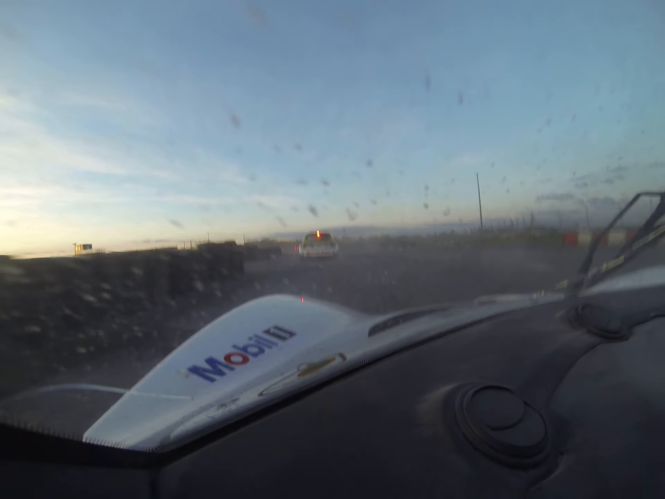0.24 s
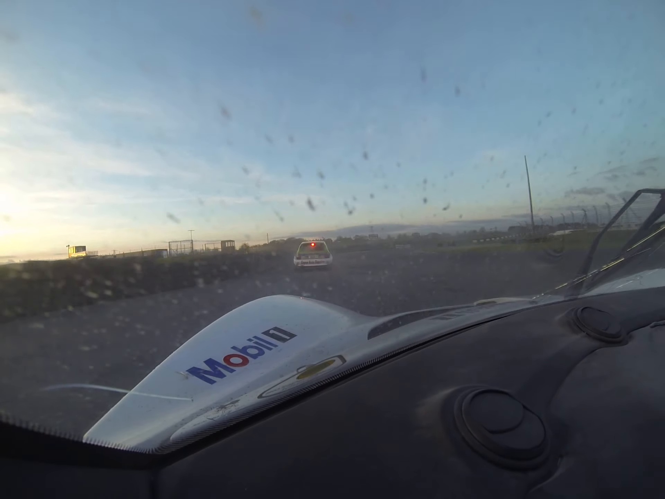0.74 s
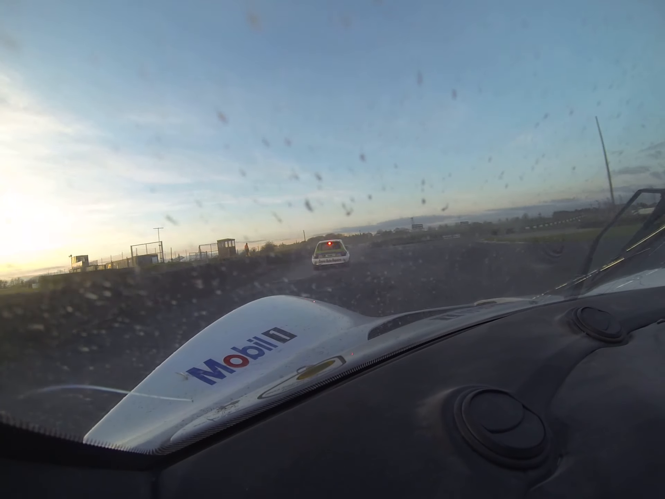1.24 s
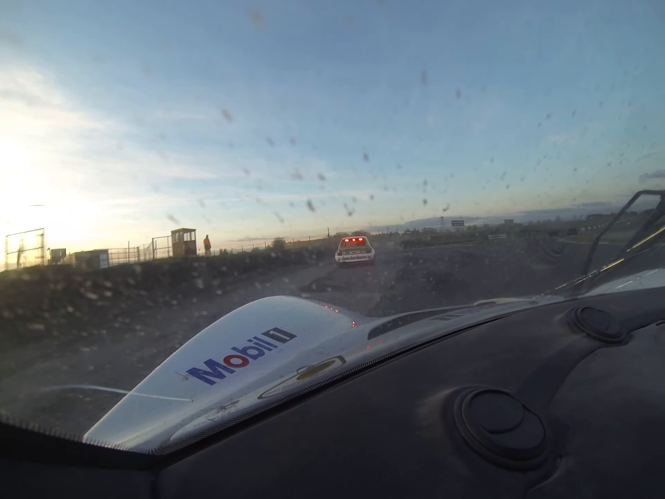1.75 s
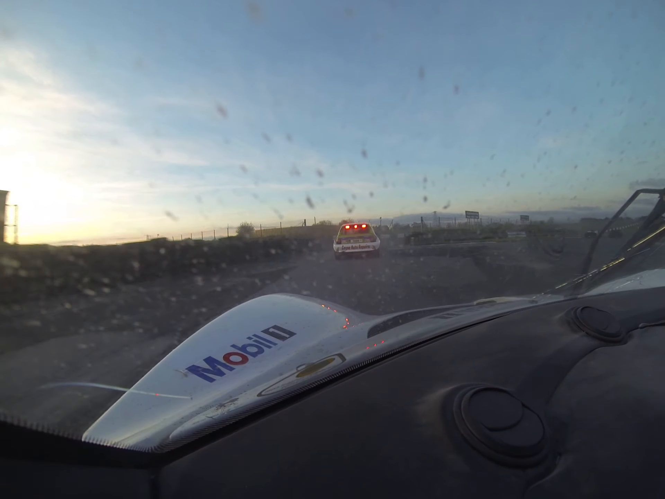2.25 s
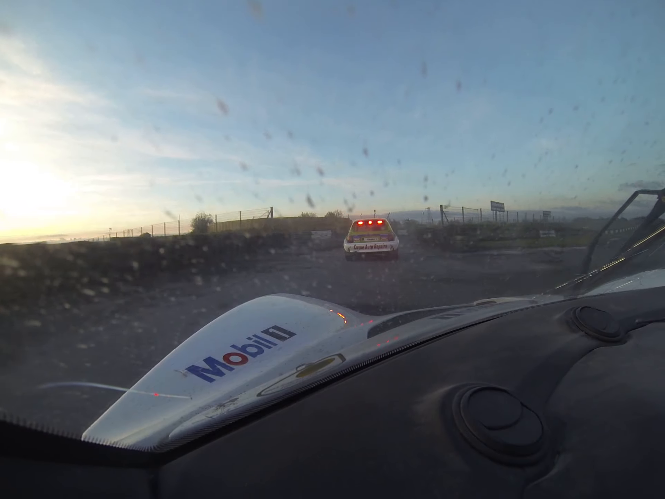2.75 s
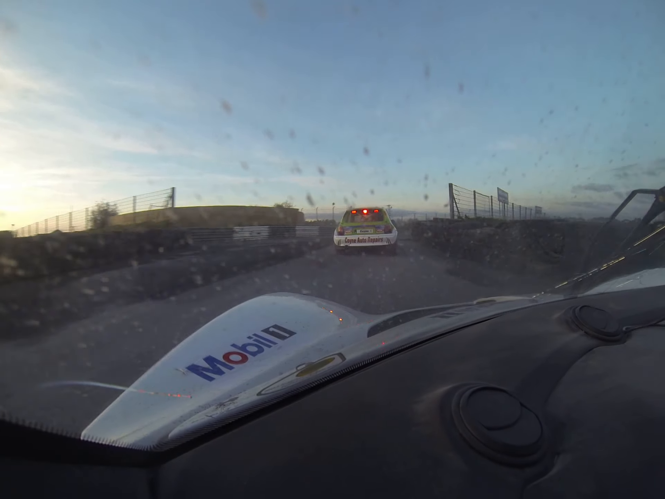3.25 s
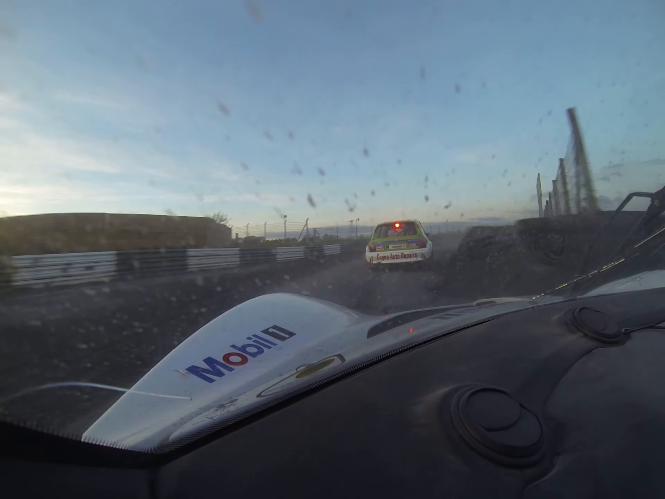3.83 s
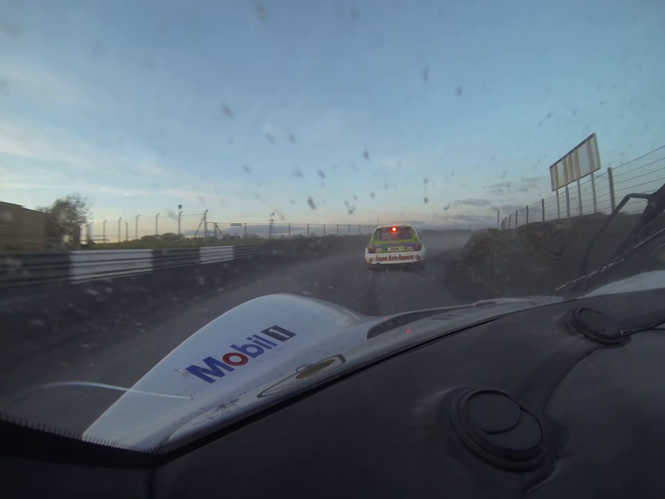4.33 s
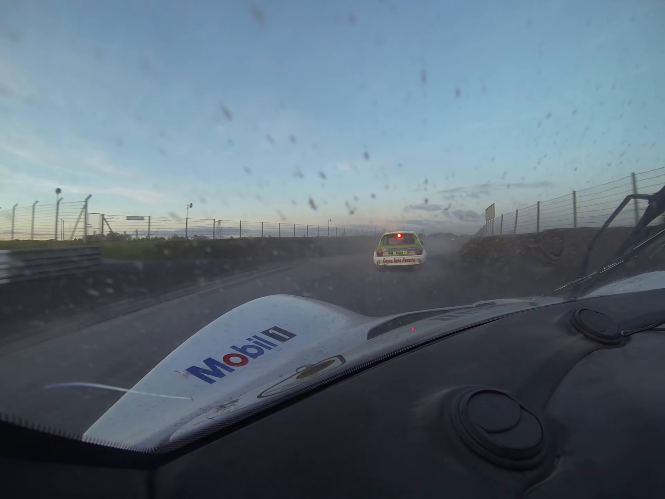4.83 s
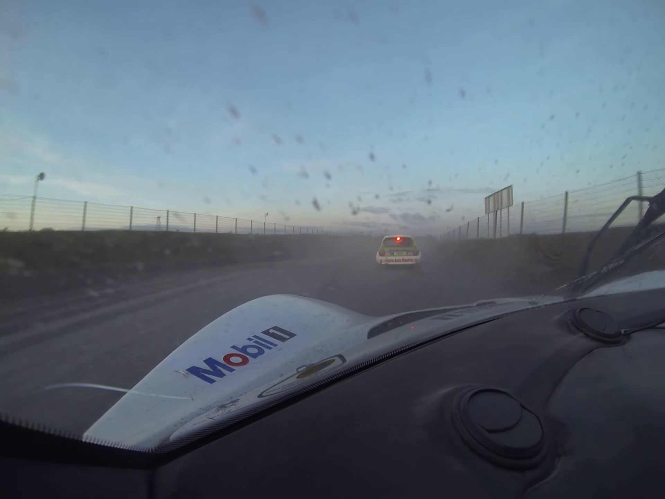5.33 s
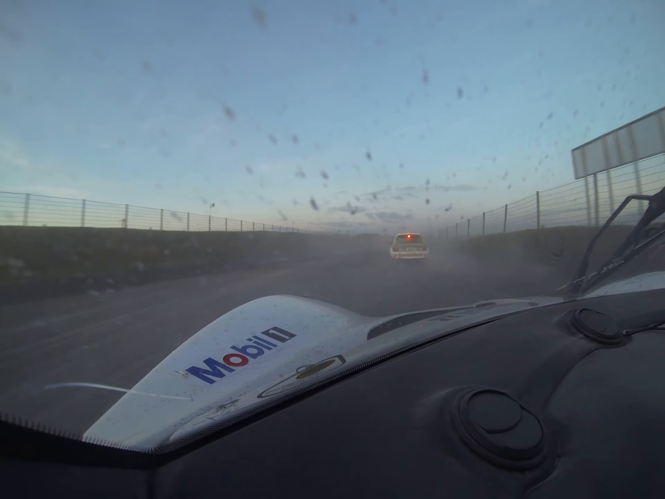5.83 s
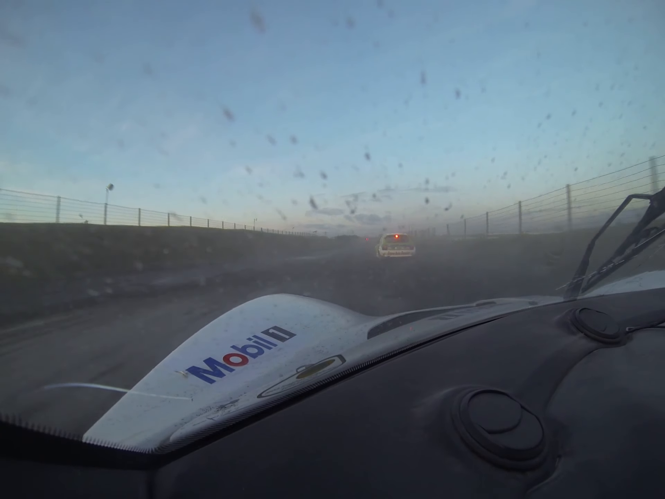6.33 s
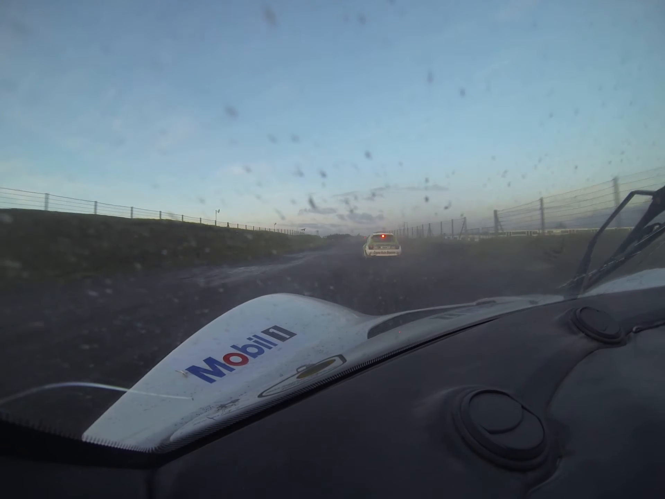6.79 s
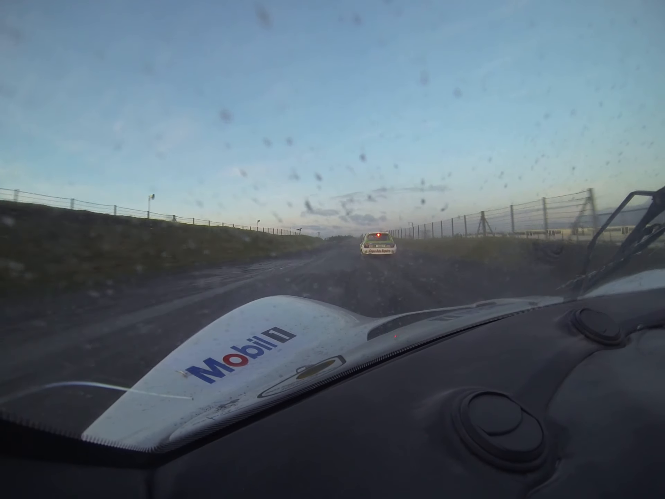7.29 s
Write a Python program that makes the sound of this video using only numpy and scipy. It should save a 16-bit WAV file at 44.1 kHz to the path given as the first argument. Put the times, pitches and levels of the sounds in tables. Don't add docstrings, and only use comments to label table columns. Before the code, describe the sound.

Close, rough cabin sound of a racing car. Sharp knocks open it, the engine surges with wheelspin, then eases off with low shaft drumming. A cluster of thuds and short squeaks follows, peaking in one heavy bang. The engine then pulls long and hard to its highest note, whining, while gravel spray hisses and stones tick underneath.

```python
import sys
import numpy as np
from scipy import signal
from scipy.fft import rfft, irfft
from scipy.io import wavfile
from scipy.ndimage import uniform_filter1d

SR = 44100
rng = np.random.default_rng(int(sys.argv[2]) if len(sys.argv) > 2 else 0)


def log_audio(samples):
    frames = np.atleast_2d(samples).T
    limited = np.clip(frames, -1, 1)
    pcm = np.round(limited * 32767).astype(np.int16)
    wavfile.write(sys.argv[1], SR, pcm)


def voltage_ratio(decibels):
    exponent = np.asarray(decibels, float) / 20
    return 10 ** exponent


N = 333396
FULL_LOAD_DB = -24.5


def rms_one(x):
    return x / np.sqrt(np.mean(x ** 2) + 1e-20)


def noise():
    return rng.standard_normal(N)


def sine(phase):
    return np.sqrt(2) * np.sin(phase)


def in_time(rows):
    s, *columns = np.transpose(rows)
    return [np.interp(np.arange(N) / SR, s, column) for column in columns]


def drift(rate_hz):
    every = 40
    r = np.exp(-2 * np.pi * every * rate_hz / SR)
    sparse = rng.standard_normal(N // every + 2002)
    slow = signal.lfilter([1], [1, -2 * r, r * r], sparse)[2000:]
    return np.interp(np.arange(N) / every, np.arange(len(slow)), rms_one(slow))


def body(x, peaks, floor):
    size = 2 ** 15
    hz = np.maximum(np.arange(size // 2 + 1) * SR / size, 1)
    floor_hz, floor_db = np.transpose(floor)
    power = voltage_ratio(np.interp(np.log(hz), np.log(floor_hz), floor_db)) ** 2
    for centre_hz, width_hz, peak_db in peaks:
        power = power + voltage_ratio(peak_db) ** 2 / (1 + (2 * (hz - centre_hz) / width_hz) ** 2) ** 2
    cepstrum = irfft(.5 * np.log(power / power.mean()))
    cepstrum[1:size // 2] *= 2
    cepstrum[size // 2 + 1:] = 0
    ring = irfft(np.exp(rfft(cepstrum)))
    return signal.oaconvolve(x, ring)[:N]


def bursts(times, levels_db, t60s, rise_s):
    out = np.zeros(N + SR)
    t = np.arange(SR // 5) / SR
    for s, level_db, t60, rise in np.broadcast(times, levels_db, t60s, rise_s):
        at = int(s * SR)
        fall = voltage_ratio(level_db - 60 * t / max(t60, .01))
        out[at:at + len(t)] += fall * (1 - np.exp(-t / max(rise, .0002)))
    return out[:N]


def hump(s, half):
    return np.exp(-((np.arange(N) / SR - s) / half) ** 2)


def swells(rows):
    return sum(change * hump(s, half) for s, change, half in rows)


def span(start, end):
    t, fade_s = np.arange(N) / SR, 0.036
    return (np.tanh((t - start) / fade_s) - np.tanh((t - end) / fade_s)) / 2


# time [s], mount sway [dB], suspension rumble [dB], half length [s].
RUTS = [(0.043, -20, -20.5, 0.32), (0.368, -17, -15.5, 0.18), (0.663, -14, -42.5, 0.093),
        (1.205, -21, -24, 0.28), (1.552, -32, -35.5, 0.18), (1.886, -19, -45, 0.22),
        (2.347, -22, -29, 0.26), (2.7, -22, -32, .13), (3.054, -15.5, -25, 0.26),
        (3.414, -21.5, -12.5, 0.11), (3.605, -20.5, -42, 0.068), (4.089, -14, -21, 0.25),
        (4.598, -32.5, -46, .2), (5.367, -15.5, -29, 0.17), (5.735, -18, -36, 0.11),
        (6.149, -24, -28, 0.096), (6.472, -19, -21, 0.14), (6.845, -24.5, -27, 0.36),
        (7.474, -18, -23, 0.095)]


def ruts(column, rest_db):
    power = voltage_ratio(rest_db) ** 2
    for row in RUTS:
        power = power + (voltage_ratio(row[column]) * hump(row[0], row[3])) ** 2
    return 10 * np.log10(power)


# pitch [Hz], width [Hz], level [dB per Hz].
BOOM = [(126, 46, -12), (190.2, 53.4, 2), (234.8, 49, -3.5), (282.7, 32.5, -4), (326, 30, -40.5)]
# pitch [Hz], level [dB per Hz].
BOOM_FLOOR = [(30, -17), (100, -18), (300, -35), (450, -25.5), (700, -34.5), (2000, -70), (8000, -120)]
# pitch [Hz], level [dB per Hz].
RUMBLE = [(15, -12.5), (40, -0.5), (65, -11.5), (82, 1.5), (105, -10), (140, -7), (300, -49.5),
          (1000, -110)]
# pitch [Hz], width [Hz], level [dB per Hz].
MOUNT = [(29, 2.5, -4)]
# pitch [Hz], level [dB per Hz].
MOUNT_FLOOR = [(8, -34), (20, -23.5), (45, -24), (100, -51), (500, -130)]


def road(mount_db, boom_db, rumble_db):
    boom = body(voltage_ratio(0.99 * drift(8.3)) * noise(), BOOM, BOOM_FLOOR)
    rumble = body(voltage_ratio(3.1 * drift(6.2)) * noise(), [], RUMBLE)
    sway = body(noise(), MOUNT, MOUNT_FLOOR)
    swing_power = uniform_filter1d(uniform_filter1d(sway ** 2, size=SR // 9), size=SR // 20)
    sway = sway / np.sqrt(swing_power)
    return voltage_ratio(boom_db + 9.5) * boom + voltage_ratio(rumble_db - 4.0) * rumble + voltage_ratio(mount_db) * sway


# time [s], peak [dB], time
# to fall 60 dB [s].
PEBBLES = [(0.066, -47.5, .04), (0.2222, -49, .04), (0.8368, -47, .04), (1.2769, -37.5, .07),
           (1.3387, -41, .05), (1.369, -36.5, .06), (1.3932, -34.5, 0.046), (2.0302, -48.5, .03),
           (2.1888, -43.5, 0.093), (2.2204, -35, 0.082), (3.267, -35.5, .07), (4.1604, -37.5, .045),
           (4.2844, -32.5, 0.054), (4.3313, -33.5, .04), (4.8718, -44.5, 0.044), (4.9631, -47.5, .03),
           (5.0867, -38, .08), (5.1891, -40.5, 0.027), (5.2258, -37, .025), (5.2664, -29, 0.11),
           (5.3687, -33.5, .05), (5.4219, -31, 0.1), (5.5274, -37.5, 0.02), (5.5817, -33, 0.044),
           (5.7684, -43, 0.055), (6.0586, -48, 0.034), (6.21, -37.5, 0.081), (6.271, -44.5, .03),
           (6.6127, -41, .05), (7.0055, -45, .03), (7.0838, -34, 0.068), (7.219, -41.5, 0.05),
           (7.553, -33.5, .04)]
# time [s], peak [dB], time to fall 60 dB [s].
CLODS = [(0.283, -42.5, 0.11), (.394, -48, .06), (0.4573, -47, 0.073), (0.5124, -34, 0.094),
         (1.0171, -45, 0.065), (1.085, -42, .06), (1.2501, -36, .06), (1.79, -42, .06), (1.84, -42.5, .06),
         (2.0, -39, .1), (2.351, -43, .05), (2.4321, -34.5, .1), (2.78, -44.5, .05), (2.8274, -38, .08),
         (2.8709, -37.5, .1), (2.9183, -43, 0.086), (3.1668, -37, 0.085), (3.3888, -43.5, 0.15),
         (3.6565, -36, 0.1), (3.7443, -40.5, .08), (3.8726, -39, 0.078), (3.9697, -46, 0.12),
         (4.0683, -35.5, 0.096), (4.194, -37.5, .15), (4.278, -22.5, 0.079), (4.3716, -44.5, .03),
         (4.7629, -37.5, 0.13), (4.91, -40, 0.075), (5.4769, -34, .07), (5.5762, -30.5, 0.096),
         (5.7196, -31.5, 0.11), (5.8694, -37.5, .08), (6.4563, -40, 0.094)]
PEBBLE_TOP_DB, CLOD_TOP_DB = -17, -30.5
# pitch [Hz], width [Hz], level [dB per Hz].
ARCH = [(4230, 740, 12), (6340, 600, 1.5), (7570, 410, -3), (10050, 610, -14.5), (11050, 510, -12)]
# pitch [Hz], level [dB per Hz].
STONE_DULL = [(1200, -23), (2500, 16.5), (4300, 9.5), (6500, -10.5), (9000, -18.5), (15000, -31.5)]
# pitch [Hz], level [dB per Hz].
STONE_BRIGHT = [(5000, -33), (8000, 1), (10000, -6.5), (14000, -7), (16000, -14)]
# pitch [Hz], level [dB per Hz].
SPRAY = [(3100, -13.5), (5400, 4), (8100, -1.5), (10100, -8), (14100, -16.5), (16100, -23.5)]


def stones(spray_db):
    hits = [(*row, PEBBLE_TOP_DB) for row in PEBBLES] + [(*row, CLOD_TOP_DB) for row in CLODS]
    s, peak_db, t60, top_db = np.transpose(hits)
    crackle = voltage_ratio(2.5 * drift(210))
    lead = 0.036 * t60
    dull = bursts(s - lead, peak_db + .8, t60, rise_s=lead) * crackle * noise()
    bright = bursts(s - lead, peak_db + top_db + 3.5, t60, rise_s=lead) * crackle * noise()
    spray = voltage_ratio(spray_db - 2.5 + 2.0 * drift(12) + 2.5 * drift(70)) * noise()
    return body(dull, ARCH, STONE_DULL) + body(bright, [], STONE_BRIGHT) + body(spray, [], SPRAY)


# time [s], pitch [Hz], level [dB], time to fall 60
# dB [s].
SQUEAKS = [
    (3.319, 1600, -15, .06),
    (3.356, 1650, -13, .05),
    (3.844, 1550, -20, .06),
    (3.876, 4957, -42, .12),
    (4.117, 1600, -17, .05),
    (4.207, 4220, -38, .06),
    (4.284, 2020, -18, .12),
    (4.293, 1690, -14, .1),
]


def squeaks():
    t, out = np.arange(N) / SR, 0
    for s, hz, level_db, t60 in SQUEAKS:
        whistle = np.sin(2 * np.pi * hz * t + 0.96 * drift(90))
        out = out + bursts([s], [level_db], t60, rise_s=0.0018) * whistle
    return out


# time [s], peak [dB], thud [dB], time for the crunch to fall 60 dB [s].
KNOCKS = [(0.139, -20, -17.5, .06), (.2, -15.5, -9.5, .028), (.262, -14.5, -31, 0.13),
          (.357, -25.5, -19, 0.045), (.392, -17, -9.5, 0.072), (.423, -10, -9, 0.064),
          (0.457, -29, -16, 0.037), (0.503, -4.5, -15.5, 0.078), (.546, -17.5, -18, 0.19),
          (1.072, -20.5, -25, 0.045), (1.113, -20.5, -19.5, .05), (1.64, -24.5, -24, .04),
          (1.785, -14, -26, 0.079), (2.005, -15.5, -12, .08), (2.41, -16, -16.5, .035),
          (2.441, -18, -9.5, 0.046), (2.817, -13, -5.5, 0.11), (2.929, -13, -15, .1), (3.288, -19, -6, .05),
          (3.312, -9.5, -12, 0.09), (3.332, -14.5, -8, .025), (3.355, -9, -5.5, 0.041),
          (3.428, -16.5, -10, 0.061), (3.448, -20.5, -26, 0.11), (3.66, -26, -32, .04),
          (3.772, -25.5, -18.5, 0.048), (3.814, -23.5, -14.5, .04), (3.844, -15.5, -8.5, 0.055),
          (3.87, -15.5, -27.5, .06), (3.934, -26, -18, 0.033), (3.956, -15.5, -9, 0.15),
          (4.115, -11.5, -18, 0.061), (4.165, -10, -5.5, 0.027), (4.224, -23, -27, 0.027),
          (4.249, -20, -26, .03), (4.287, -14.5, -8.5, 0.15), (4.325, -3, -1, 0.048),
          (4.372, -15.5, -17, 0.036), (4.89, -20.5, -18, .04), (5.268, -10.5, -10, 0.11),
          (6.459, -31.5, -10.5, .05), (6.515, -18.5, -18, 0.052), (6.555, -25.5, -8, 0.06),
          (6.61, -13.5, -6.5, 0.04), (6.79, -25, -13.5, .05), (6.835, -22.5, -25, .04)]
# pitch [Hz], width [Hz], level [dB per Hz].
PLATE = [(1600, 620, 0), (1990, 160, -12.5), (610, 240, -8)]
# pitch [Hz], level [dB per Hz].
PLATE_FLOOR = [(200, -41.5), (1500, -19.5), (4000, -45), (15000, -88)]
# pitch [Hz], width [Hz], level [dB per Hz].
PANELS = [(500, 47, -13.5), (837, 150, -10.5), (1005, 129, -0.5), (1079, 4.9, 3.5), (1352, 140, -3),
          (1525, 110, 2), (1677, 120, 1.5), (1896, 140, -4), (2030, 56, -4.5), (2305, 60, -12),
          (2876, 160, -14), (3240, 52, -19), (3606, 54, -21), (3910, 250, -27.5), (4283, 140, -20.5),
          (4643, 230, -27.5), (5002, 110, -32.5), (6200, 93, -43), (7210, 710, -46)]
# pitch [Hz], level [dB per Hz].
PANEL_FLOOR = [(100, -30), (350, -8), (680, -20), (1200, -11.5), (2000, -15.5), (2200, -23), (3400, -31.5),
               (5400, -56), (9100, -67), (14100, -70.5)]


def knocks():
    s, peak_db, thud_db, t60 = np.transpose(KNOCKS)
    lead = 0.072 * t60
    crunch = bursts(s - lead, peak_db - 1.0, t60, rise_s=1.8 * lead) * voltage_ratio(2.0 * drift(90)) * noise()
    crunch[((s + .0015) * SR).astype(int)] -= voltage_ratio(peak_db + 15.5 - 140 * t60)
    crunch = signal.sosfilt(signal.butter(1, 2600, fs=SR, output="sos"), crunch)
    thud = bursts(s - .003, thud_db - 10.5, t60s=0.089, rise_s=0.00077) * noise()
    thud[((s - .002) * SR).astype(int)] -= voltage_ratio(thud_db + 24.0)
    thud = signal.sosfilt(signal.butter(2, 330, fs=SR, output="sos"), thud)
    floor_plate = voltage_ratio(-4) * body(crunch, PLATE, PLATE_FLOOR)
    return body(crunch, PANELS, PANEL_FLOOR) + floor_plate + body(thud, BOOM, BOOM_FLOOR)


# start [s], end [s], gear mesh [dB], half mesh [dB], fourth order [dB].
PULLS = [
    (1.123, 1.901, -58, -45.5, -43.5),
    (5.145, 5.542, -46, -49, -52),
    (5.543, 5.88, -34, -44, -49),
    (5.882, 6.495, -38, -38, -61.5),
    (6.837, 7.701, -62.5, -32.5, -35.5),
]
# time [s], pitch [Hz], level [dB].
SHAFT = [
    (2.1, 74.2, -32.5),
    (2.316, 91.1, -25),
    (2.9, 70.3, -31.5),
]
WHINE_RATIO = 9.4


def transmission(turn, firing_hz):
    gains = sum(np.outer(voltage_ratio(np.array(levels_db)), span(start, end)) for start, end, *levels_db in PULLS)
    off_ring = (WHINE_RATIO * firing_hz - 1576) / 24
    gains[0] *= voltage_ratio(14 / (1 + off_ring ** 2))
    whine = 0
    for k, gain in zip((WHINE_RATIO, WHINE_RATIO / 2, 4), gains):
        whine = whine + gain * voltage_ratio(2.7 * drift(11)) * sine(k * turn + 0.3 * drift(13))
    before, after = [(0, 82.2, -55.5), (2.0, 78.85, -83.5)], [(3.0, 110, -70.5), (8, 52, -71.5)]
    shaft_hz, shaft_db = in_time(before + list(SHAFT) + after)
    shaft_turn = 2 * np.pi * np.cumsum(shaft_hz) / SR
    return whine + voltage_ratio(shaft_db + 1.2 * drift(7.2)) * sine(shaft_turn)


PATCH_EDGES_HZ = [750, 1200, 1450, 1800, 2150, 2600, 3400, 4000]


def patchy(x, swing_db):
    patch_db, treble_follows = 1.8, 0.34
    out, count = 0, len(PATCH_EDGES_HZ)
    for k, edge_hz in enumerate(PATCH_EDGES_HZ):
        low = signal.sosfiltfilt(signal.butter(2, edge_hz, fs=SR, output="sos"), x)
        out = out + voltage_ratio(patch_db * drift(12.0) + treble_follows * swing_db * k / count) * low
        x = x - low
    return out + voltage_ratio(patch_db * drift(9.0) + treble_follows * swing_db) * x


# multiple of firing rate, level against the clatter [dB].
UPPER = [(1.25, -15), (1.5, -25), (2.25, -1.5), (2.5, -3.5), (2.75, -19.5), (3.5, -22), (3.75, -2.5),
         (4.5, -5.5), (5, -0.5), (5.5, -8), (5.75, -12.5), (6, -1), (6.5, -13.5), (7, -9.5), (7.25, -20),
         (8, -8), (9, -4.5)]


def engine_in_panels(turn, load_db, lift_db):
    orders = 0
    for k, level_db in UPPER:
        orders = orders + voltage_ratio(level_db + 3.2 * drift(5)) * np.sin(k * turn + .4 * k ** .5 * drift(6))
    gate = 1 + .5 * np.sin(turn) + 0.046 * np.sin(turn / 4)
    grit = voltage_ratio(2.0 * np.minimum(rng.exponential(1, N), 3.5))
    clatter = rms_one(gate * grit * voltage_ratio(1.0 * drift(1.1) + 1.0 * drift(44)) * noise())
    drive = clatter + voltage_ratio(-20.5 + 0.26 * (load_db + 26.0) + 1.3 * lift_db) * orders
    twist = np.pi / 4 * (1 + np.tanh(drift(5.0)))
    flexed = 0
    for pitch_ratio, share in ((1 - .006, np.cos(twist) ** 2), (1 + .006, np.sin(twist) ** 2)):
        tuned = [(hz * pitch_ratio, width_hz, db) for hz, width_hz, db in PANELS]
        flexed = flexed + body(share * drive, tuned, PANEL_FLOOR)
    return voltage_ratio(load_db) * rms_one(patchy(flexed, load_db - FULL_LOAD_DB))


# pitch [Hz], level at full load [dB].
SECOND = [(275, -38), (300, -22), (322, -34), (340, -22), (372, -31.5), (395, -35.5), (420, -37.5),
          (455, -29.5)]
# pitch [Hz], level at full load [dB].
THIRD = [(410, -44.5), (450, -39), (500, -41.5), (550, -42), (600, -54.5), (625, -39), (660, -51),
         (700, -41)]


def exhaust(turn, firing_hz, note_db, effort_db):
    levels_db = [note_db]
    for k, pipe in ((2, SECOND), (3, THIRD)):
        pipe_db = np.interp(k * firing_hz, *np.transpose(pipe))
        levels_db.append(pipe_db + effort_db + 2.5 * drift(5.1))
    tones = 0
    for k, level_db in enumerate(levels_db, 1):
        tones = tones + voltage_ratio(level_db + 1.2 * drift(20)) * sine(k * turn + .15 * k * drift(21))
    return tones


# time [s], rate [Hz].
FIRING = [(0, 182), (.45, 189.7), (.9, 188), (1.22, 198.7), (1.85, 211.7), (1.95, 200.3), (2.1, 202),
          (2.5, 182.7), (2.85, 164.7), (3.1, 166.3), (3.7, 136.6), (4.2, 145), (4.5, 142.1), (5.3, 160.8),
          (5.55, 164.9), (6.45, 189), (7.1, 216), (7.56, 217)]
# time [s], rise [Hz], half length [s].
FLARES = [
    (.24, 11, .1),
    (0.761, 7, 0.099),
    (1.13, 16, .07),
    (2.72, 4.015, 0.058),
    (5.05, 2.492, .1),
    (6.58, 12, .06),
    (6.96, 23, .1),
    (7.34, 18, 0.14),
]
# time [s], level [dB].
NOTE = [(.15, -19), (.32, -34.5), (.76, -17), (1.36, -10.5), (1.78, -20.5), (2.11, -11.5), (2.7, -15.5),
        (2.87, -28.5), (3.03, -19), (3.2, -31), (4.4, -37), (5.2, -26), (5.55, -27.5), (5.85, -10.5),
        (6.45, -12.5), (6.64, -20), (7.42, -17), (7.56, -24)]
# time [s], level [dB].
LOAD = [(0, -28.5), (.38, -31.5), (.55, -33), (.78, -28), (1.12, -24.5), (1.83, -23.5), (2.06, -28),
        (2.42, -30), (2.86, -27), (3.26, -30), (3.47, -34), (4.17, -29), (4.57, -34), (4.82, -31.5),
        (5.12, -23.5), (6.44, -27), (6.8, -27.5), (7.2, -26)]
# start [s], end [s], change [dB].
LIFTS = [
    (0.391, 0.658, -13.5),
    (0.841, 0.979, -8.5),
    (1.942, 2.404, -3),
    (2.41, 3.599, -12.5),
    (4.497, 4.98, 3),
    (6.517, 6.821, -0.5),
    (7.29, 7.412, -18),
]
# time [s], extra [dB], half length [s].
SURFACE = [(.5, 0, 0.11), (1.22, 1.5, 0.12), (2.0, 3.5, 0.11), (2.32, 0.5, .12), (3.1, 2, 0.14),
           (4.15, 1.5, 0.21), (5.17, 2.5, 0.069), (5.68, 1.5, 0.087), (6.07, -5, 0.21), (6.8, -1.5, 0.19),
           (7.45, 1.5, 0.11)]
# time [s], extra [dB], half length [s].
PUDDLES = [
    (.53, 8, 0.08),
    (1.33, 4, 0.092),
    (2.2, 1.5, 0.13),
    (4.17, -0.5, .11),
    (5.25, 4, 0.5),
    (7.1, 2, .3),
]


def scene():
    firing_hz = in_time(FIRING)[0] + swells(FLARES)
    turn = 2 * np.pi * np.cumsum(firing_hz) / SR
    load_db, note_db = in_time(LOAD)[0], in_time(NOTE)[0]
    swing_db = load_db - FULL_LOAD_DB
    lift_db = sum(change_db * span(start, end) for start, end, change_db in LIFTS)
    boom_db = -29.5 + 0.46 * swing_db - 0.069 * (note_db - FULL_LOAD_DB) + swells(SURFACE)
    spray_db = -59 + 1.2 * swing_db + swells(PUDDLES)
    shell = road(ruts(column=1, rest_db=-29.5), boom_db, ruts(column=2, rest_db=-36))
    hits = stones(spray_db) + squeaks() + knocks()
    car = transmission(turn, firing_hz) + engine_in_panels(turn, load_db, lift_db)
    car = car + exhaust(turn, firing_hz, note_db, 0.41 * swing_db + lift_db)
    return (shell + hits + car)[None]


# time [s], depth [dB], recovery [s].
DUCKS = [
    (0.313, -5.5, 0.046),
    (0.56, -4.5, 1),
    (3.37, -9.5, 0.0091),
    (3.47, -4, 0.73),
    (4.343, -6, 0.15),
    (6.629, -7, 0.12),
]


def ducking():
    t, gain_db = np.arange(N) / SR, 0
    for s, depth_db, recovery_s in DUCKS:
        since = np.maximum(t - s, 0)
        gain_db = gain_db + depth_db * (1 - np.exp(-since / 0.0069)) * np.exp(-since / recovery_s)
    return voltage_ratio(gain_db)


def roll_off(x):
    return signal.sosfilt(signal.butter(12, 15250, fs=SR, output="sos"), x)


def record(dry):
    soft = np.clip(1.398 * np.tanh(ducking() * dry / 1.22), -1, 1)
    cut = signal.sosfilt(signal.cheby2(10, 50, 16200, fs=SR, output="sos"), soft)
    return roll_off(cut)


dry = scene()
out = record(dry)
log_audio(out)
```